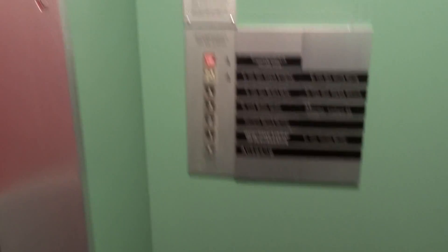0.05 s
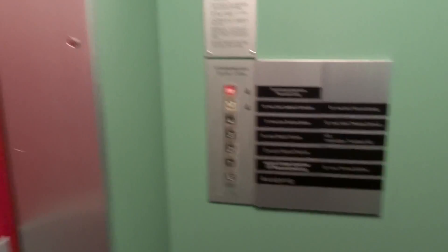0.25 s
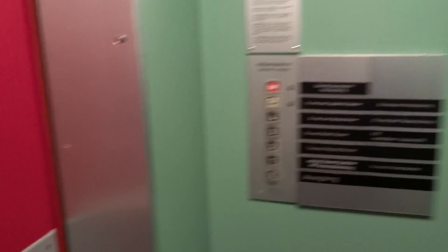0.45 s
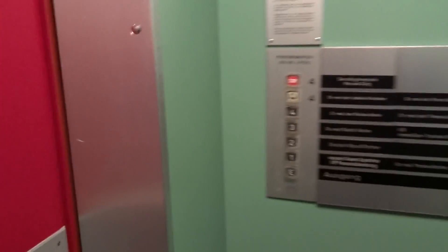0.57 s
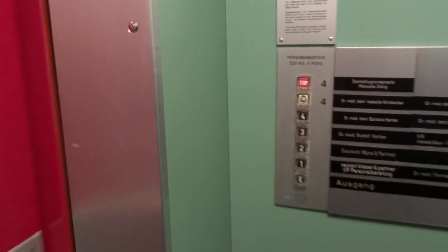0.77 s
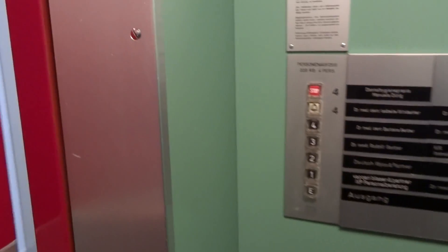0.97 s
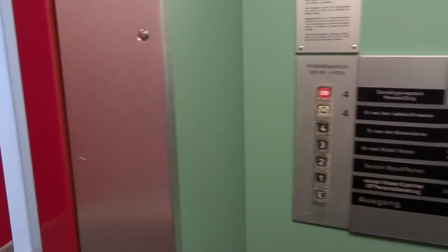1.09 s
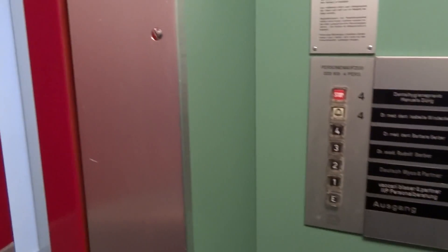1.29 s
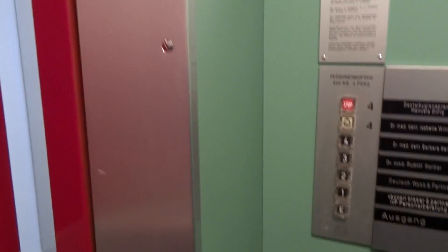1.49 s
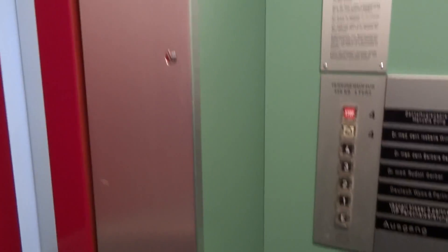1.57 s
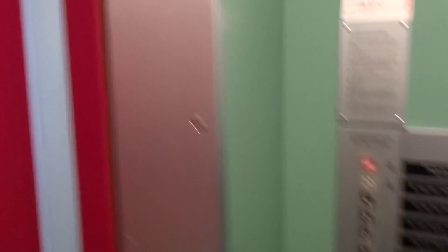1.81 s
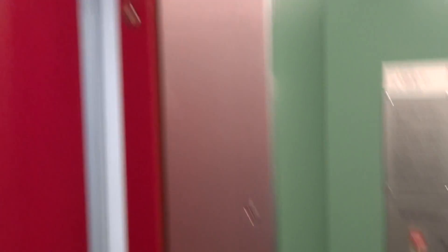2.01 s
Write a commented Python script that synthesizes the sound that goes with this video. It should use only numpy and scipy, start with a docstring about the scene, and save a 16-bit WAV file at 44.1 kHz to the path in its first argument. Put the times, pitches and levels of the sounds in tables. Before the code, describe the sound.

A metal latch rattles with four quick clacks inside a small elevator, ringing the door panel. A soft cloth-like swish with thuds passes close to the microphone, then come two hollow knocks and a fainter swish over low rumble.

```python
"""Rattling latch in a lift cabin

Inside a small lift, a latch straight ahead of the stereo microphone clacks four times, ringing the
door panel and the cabin. Close by, a soft friction swish like cloth brushing past carries a knock and
soft thuds and ends in a scrape and light ticks. Two dull hollow knocks and a second, fainter swish
follow, all over the low uneven rumble of the cabin."""
import sys
import numpy as np
from scipy import signal
from scipy.fft import irfft
from scipy.io import wavfile
from scipy.ndimage import uniform_filter1d

SR = 44100
rng = np.random.default_rng(int(sys.argv[2]) if len(sys.argv) > 2 else 0)


def wav_record(signal):
    """Record a signal, one row per channel, as 16-bit PCM in the file named by sys.argv[1]."""
    frames = np.transpose(np.atleast_2d(signal))
    bounded = np.clip(frames, -1, 1)
    # unit amplitude maps onto the largest positive 16-bit level
    quanta = np.round(bounded * 32767).astype(np.int16)
    wavfile.write(sys.argv[1], SR, quanta)


N = 90404
T = np.arange(N) / SR
FREQS = np.maximum(np.fft.rfftfreq(N, 1 / SR), 1)

# Stereo width of the latch, straight ahead. Each row: frequency in Hz, side against mid in dB.
LATCH_WIDTH = [(200, -35), (430, -25), (850, -13.5), (1700, -10.5), (3500, -11.5), (7000, -16),
               (12000, -20)]


def latch():
    """Each clack is a quick run of contacts: the latch ticks, its bar and the door panel ring."""
    # Each row: start in seconds, then relative levels in dB of panel, metal tick and latch bar.
    clacks = [(0.2343, 2.5, -4, 3), (0.274, -1.5, -6, 0.5), (0.3165, -2.5, -8, -14), (0.34, -3, -8.5, -7)]
    # Contacts within a clack. Each row: delay in seconds, push on the panel in dB, tick in dB.
    contacts = [(0.0, -1.5, -11), (0.0033, -1.5, 1), (0.007, -0.5, -15)]
    # Each row: frequency in Hz, relative level in dB, t60 in seconds.
    panel_modes = [(206.5, -10, 1.77), (242, -6.5, 0.76), (323, 5.5, 0.31), (480.6, 0, 0.48),
                   (528.3, -0.5, 0.36), (547, 0, 0.21), (614, -11, .3), (719.4, -3.5, 0.11),
                   (1116, -1.5, 0.24), (1147.6, 7.5, 0.063), (1348, -3.5, 0.38), (1575, -4.5, 0.37),
                   (1873, -8, 0.32), (2298, 5, 0.095), (2325, 4, 0.11)]
    bar_modes = [(2036, 6, .19), (2125, -9, 0.11), (2130, -5, 0.28)]
    pushes = [(start + lag, db + push) for start, db, _, _ in clacks for lag, push, _ in contacts]
    ticks = [(start + lag, db + tick) for start, _, db, _ in clacks for lag, _, tick in contacts]
    body = door_body(pushes)
    panel_attack_s, bar_attack_s = 0.0028, 0.018
    panel = struck(panel_modes, [(start, db, panel_attack_s) for start, db, _, _ in clacks])
    bar = struck(bar_modes, [(start, db, bar_attack_s) for start, _, _, db in clacks])
    return undb(-31) * body + undb(-39) * (panel + bar) + undb(-27) * latch_metal(ticks)


def door_body(pushes):
    """Each push sets off the dense ring of door and cabin; the low bands last longest."""
    # Each row: frequency in Hz, relative spectral level in dB.
    tone = [(100, -11), (170, -6.5), (280, -6), (390, -11), (520, -2.5), (700, -4.5), (800, -9), (1000, -8),
            (1150, -5), (1620, -2.5), (1750, -7), (2200, -1.5), (2450, -12), (2780, -5.5), (3100, -13),
            (3700, -21.5), (6000, -22.5), (15000, -62)]
    # Each row: lower and upper band edge in Hz, t60 in seconds.
    decays = [(19.8, 290, 0.52), (324, 1100, 0.32), (1043, 3000, 0.19), (3120, 18000, 0.14)]
    spectrum, body = colour(tone), 0
    for low, high, t60 in decays:
        band = spectrum * (FREQS >= low) * (FREQS < high)
        share = np.sqrt(np.sum(band ** 2) / np.sum(spectrum ** 2))
        wash = even(noise(band, LATCH_WIDTH, ripple_db=3.0), 0.016)
        body = body + share * rattle(pushes, t60) * wash
    return body


def latch_metal(ticks):
    """The metal's bright resonances give a sharp strike and a softer ring after it."""
    # Each row: centre and width in Hz, relative level in dB at the strike and in the ring.
    peaks = [(3150, 350, -1.5, -11), (4220, 420, -4, -3), (5200, 240, 3, 0), (5870, 200, 7, 6),
             (7700, 360, 0, -6), (8200, 270, 1, 4), (11040, 1500, -3, -7.5), (12100, 2800, -16, -18)]
    strike_tone = resonances((hz, width, db) for hz, width, db, _ in peaks)
    tail_tone = resonances((hz, width, db) for hz, width, _, db in peaks)
    strike = even(noise(strike_tone, LATCH_WIDTH), 0.0043) * rattle(ticks, t60=0.018)
    tail = even(noise(tail_tone, LATCH_WIDTH), 0.012) * rattle(ticks, t60=0.22)
    return strike + undb(-14) * tail


def slide():
    """Soft friction close by: tiny catches roughen all its layers together; a few snags stand out."""
    # Treble, middle and low rubbing. Each row: frequency in Hz, relative spectral level in dB.
    hiss = [(2000, -9.5), (4500, -9.5), (6500, -3), (9000, -2), (13000, -4.5), (14500, -6), (15800, -37)]
    swish = [(900, -75), (1800, -9.5), (2400, 2.5), (3000, -0.5), (3800, -1), (5000, -4.5), (7000, -8.5),
             (14000, -23)]
    scuff = [(120, -25), (270, -4), (380, -7), (520, -0.5), (800, -4.5), (1300, -8.5), (2000, -11),
             (4000, -36), (9000, -65)]
    # Their swells, and the second swish's airy sheen. Each row: time in seconds, level in dB.
    hiss_level = [(0, -55.5), (.2, -58), (.38, -58), (.45, -46), (.52, -51.5), (.57, -48), (.66, -49.5),
                  (.70, -44), (.74, -44), (.80, -54), (.88, -57.5), (1.0, -60), (1.15, -66), (1.44, -65),
                  (1.6, -58), (1.77, -56.5), (1.95, -53.5), (2.05, -52)]
    swish_level = [(0, -59.5), (.2, -68), (.4, -55), (.46, -49), (.52, -48.5), (.6, -48), (0.671, -49.5),
                   (.70, -39), (.74, -39), (.79, -43), (.86, -49), (.97, -55), (1.1, -62), (1.45, -67.5),
                   (1.6, -58.5), (1.8, -57), (1.95, -53.5), (2.05, -54)]
    scuff_level = [(0, -57), (.2, -56.5), (.45, -47), (.54, -51), (.68, -45.5), (.76, -48.5), (.82, -47),
                   (.94, -48.5), (1.05, -52.5), (1.15, -63), (1.4, -67.5), (1.7, -53), (1.8, -54),
                   (1.91, -48.5), (2.05, -48)]
    sheen_level = [(0, -84), (1.42, -76), (1.58, -60), (1.67, -60.5), (1.73, -51.5), (1.84, -56.5),
                   (1.91, -52.5), (2.05, -57)]
    # Thin bright snags in the second swish. Each row: start in seconds, level in dB, centre in Hz.
    snag_events = [(1.56, -53, 13200), (1.78, -42.5, 11800), (1.918, -50, 10900)]
    catches_per_s = 500
    catches_db = wander(T * catches_per_s)
    layers = [(hiss, hiss_level), (swish, swish_level), (scuff, scuff_level)]
    rub = sum(even(moving_noise(colour(tone)), 0.05) * curve(level) for tone, level in layers)
    sheen = noise(resonance(11800, width_hz=7400)) * curve(sheen_level)
    snags = sum(undb(db) * ring(start, t60=0.05, attack=0.0039) * noise(resonance(hz, width_hz=3100))
                for start, db, hz in snag_events)
    return undb(catches_db) * (rub + sheen + snags)


def scrape():
    """A brief hollow scrape swells and dies as the first swish ends."""
    # Each row: centre and width in Hz, relative level in dB.
    peaks = [(278, 80, 0), (498, 56, 6), (920, 140, -5), (1210, 270, -3.5)]
    return undb(-42) * even(noise(resonances(peaks)), 0.034) * ring(0.838, t60=0.37, attack=0.019)


def light_ticks():
    """Light ticks of differing brightness trail the first swish."""
    # Each row: start in seconds, level in dB, treble lift in dB.
    ticks = [(0.922, -39, -3), (0.964, -44, 13), (1.12, -52, -13)]
    # Each row: frequency in Hz, relative spectral level in dB.
    tone = [(200, -17), (700, -3), (1400, 8.5), (3000, 1), (5000, -6.5), (9000, -7), (15000, -37)]
    treble = resonance(6800, width_hz=6800)
    return sum(undb(db) * ring(start, t60=0.094, attack=0.0028) * noise(colour(tone) * undb(lift * treble))
               for start, db, lift in ticks)


def wall_knocks():
    """Knocks on the hollow wall give a dull thump and leave its modes ringing."""
    # Each row: start in seconds, level in dB, attack in seconds.
    knocks = [(0.579, -44.5, 0.01), (1.46, -48, .002), (1.568, -47, 0.024)]
    # Each row: centre and width in Hz, relative level in dB.
    thump_peaks = [(354, 135, -4.5), (520, 133, -7), (723, 154, 0.5), (1140, 800, -19)]
    # Each row: frequency in Hz, relative level in dB, t60 in seconds.
    wall_modes = [(660, -3, 0.71), (755, -3.5, 0.48)]
    hollow = even(noise(resonances(thump_peaks)), 0.02)
    envelope = sum(undb(db) * ring(start, t60=0.42, attack=rise) for start, db, rise in knocks)
    return undb(-1) * hollow * envelope + struck(wall_modes, knocks)


def wall_thuds():
    """Soft blows stir one low resonance of the cabin wall."""
    # Each row: start in seconds, level in dB, attack in seconds.
    thuds = [(0.454, -38, 0.0081), (0.606, -43, 0.0083), (0.651, -42.5, 0.0042)]
    wall = even(noise(resonance(225, width_hz=34)), 0.02)
    return wall * sum(undb(db) * ring(start, t60=0.29, attack=rise) for start, db, rise in thuds)


def cabin():
    """Deep rumble, the cabin's booming air resonance and faint steady air all round the microphone."""
    # Each row: frequency in Hz, relative spectral level in dB.
    rumble_tone = [(15, -26), (32, 11.5), (55, 9), (80, 8), (130, -33), (300, -33)]
    air_tone = [(100, -6.5), (210, 2), (330, -1.5), (480, -3.5), (900, -5.5), (2000, -14), (5000, -23.5),
                (14000, -52)]
    # Each row: time in seconds, level in dB.
    rumble_level = [(0, -57), (.2, -54), (.42, -50), (.5, -41), (.58, -44.5), (.72, -43), (.9, -47.5),
                    (1.05, -52), (1.15, -55.5), (1.32, -53.5), (1.5, -51.5), (1.8, -61.5), (2.05, -56)]
    boom_level = [(0, -61), (.2, -56.5), (.28, -41.5), (.42, -49.5), (.56, -49.5), (.62, -40), (.74, -42.5),
                  (.8, -46.5), (1.0, -56), (1.38, -62.5), (1.43, -47), (1.49, -53), (1.54, -42),
                  (1.58, -50), (1.62, -47), (1.66, -46.5), (1.70, -43.5), (1.725, -49.5), (1.76, -43),
                  (1.81, -54), (2.05, -60)]
    # Each row: frequency in Hz, side against mid in dB.
    air_width = [(60, -7), (200, -4.5), (850, -0.5), (1700, 2), (3500, -1.5), (12000, 1)]
    rumble = even(noise(colour(rumble_tone)), 0.067) * curve(rumble_level)
    boom = even(noise(resonance(99.6, width_hz=21.3)), 0.0373) * curve(boom_level)
    return rumble + boom + undb(-59.5) * noise(colour(air_tone), air_width)


def struck(modes, blows):
    """Modes (Hz, dB, t60 s) fed by blows (s, dB, attack s); each blow also knocks their phase."""
    kick_rad, spread_rad = 1.2, 0.1
    out = 0
    for hz, db, t60 in modes:
        energy = sum((undb(blow_db) * ring(start, t60, rise)) ** 2 for start, blow_db, rise in blows)
        kicks = sum(kick_rad * rng.standard_normal() * np.clip((T - start) / rise, 0, 1)
                    for start, _, rise in blows)
        phase = 2 * np.pi * (hz * T + rng.random()) + kicks
        stereo_offset = spread_rad * rng.uniform(-1.1, 1) * np.array([[1], [-1]])
        out = out + undb(db) * np.sqrt(energy) * np.sin(phase + stereo_offset)
    return out


def ring(start, t60, attack=0.00024):
    """Envelope of a blow: a linear rise, then exponential decay."""
    return np.clip((T - start) / attack, 0, 1) * undb(-60 * np.maximum(T - start - attack, 0) / t60)


def rattle(hits, t60):
    """Envelope of a run of hits (s, dB) whose energies add."""
    return np.sqrt(sum((undb(db) * ring(start, t60)) ** 2 for start, db in hits))


def noise(gain, width=None, ripple_db=3.5):
    """Stereo noise with a mid of rms 1, given fine peaks and dips by the cabin's standing waves."""
    # Default width, for nearby sources. Each row: frequency in Hz, side against mid in dB.
    near_width = [(30, -48), (90, -45), (200, -26), (430, -14.5), (1700, -10.5), (7000, -12.5),
                  (13000, -18)]
    spacing_hz, full_depth_hz = 39.94, 2800
    ripple = undb(ripple_db * np.minimum(FREQS / full_depth_hz, 1) * wander(FREQS / spacing_hz))
    mid, side = gain * ripple * np.exp(2j * np.pi * rng.random((2, len(FREQS))))
    mid, side = irfft(mid, N), irfft(side * colour(width or near_width), N)
    return np.array([mid + side, mid - side]) / mid.std()


def moving_noise(gain, turns_per_s=1.282):
    """Noise of a moving source: it passes from one set of standing waves to another."""
    turn = 2 * np.pi * (turns_per_s * T + rng.random())
    return np.cos(turn) * noise(gain) + np.sin(turn) * noise(gain)


def wander(position):
    """A random line with a new Gaussian value at each whole step of position."""
    return np.interp(position, np.arange(len(position)), rng.standard_normal(len(position)))


def even(x, seconds):
    """Noise with its chance swells evened out over the given window."""
    return x / np.sqrt(uniform_filter1d((x ** 2).mean(0), max(int(seconds * SR), 8)) + 1e-9)


def resonance(hz, width_hz):
    """Gain of a steep resonance."""
    return 1 / (1 + ((FREQS ** 2 - hz ** 2) / (FREQS * width_hz)) ** 2)


def resonances(peaks):
    """Summed gain of several resonances (Hz, width Hz, dB)."""
    return sum(undb(db) * resonance(hz, width) for hz, width, db in peaks)


def colour(points):
    """Gain of a (Hz, dB) table on a log-frequency axis."""
    hz, db = np.array(points).T
    return undb(np.interp(np.log(FREQS), np.log(hz), db))


def curve(points):
    """Gain over time from a (s, dB) table."""
    return undb(np.interp(T, *np.array(points).T))


def undb(db):
    """Decibels to gain."""
    return 10 ** (np.asarray(db) / 20)


def scene():
    """Everything that reaches the microphone inside the cabin."""
    return latch() + light_ticks() + wall_knocks() + wall_thuds() + slide() + scrape() + cabin()


def record(dry):
    """The recorder cuts the top steeply."""
    top_hz = 15600
    return signal.sosfilt(signal.ellip(10, 0.2, 80, top_hz, fs=SR, output="sos"), dry)


dry = scene()
out = record(dry)
wav_record(out)
```